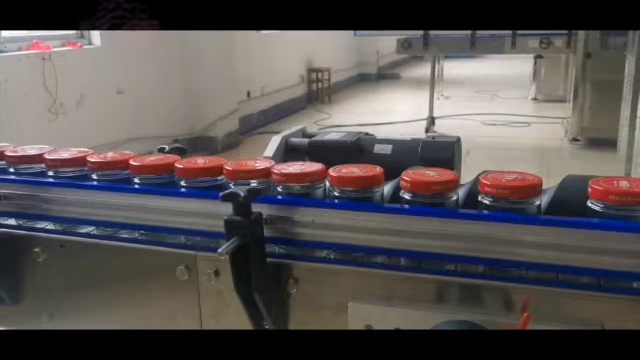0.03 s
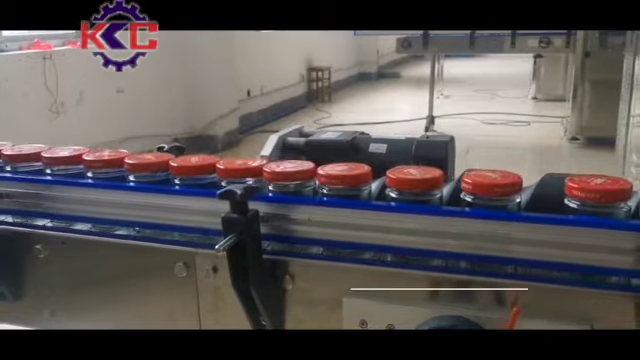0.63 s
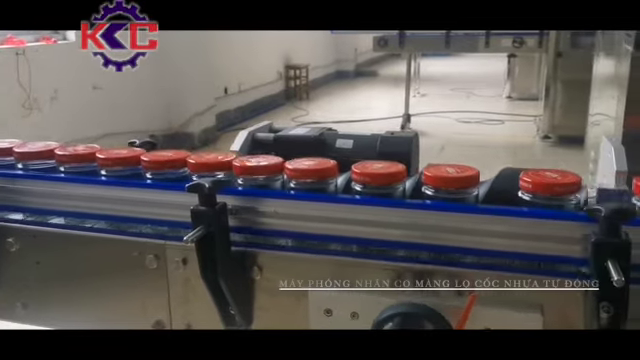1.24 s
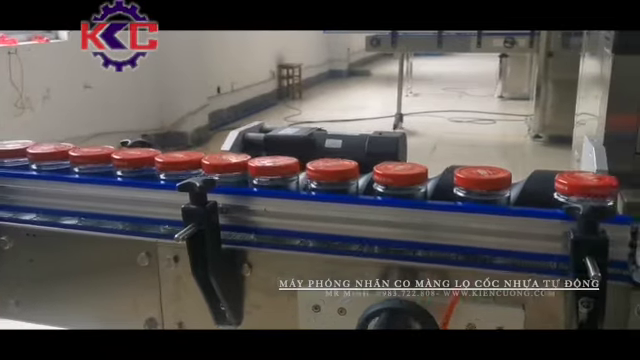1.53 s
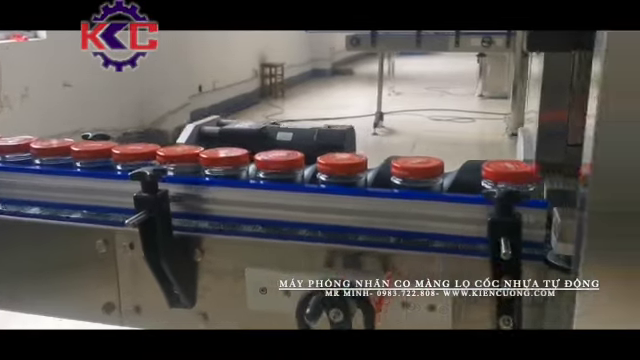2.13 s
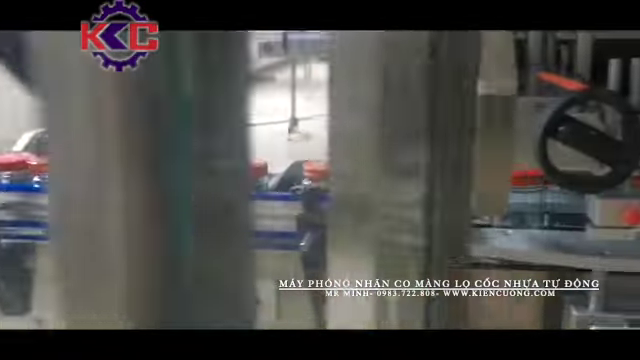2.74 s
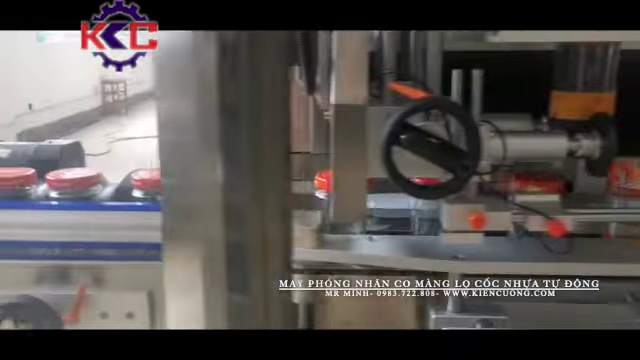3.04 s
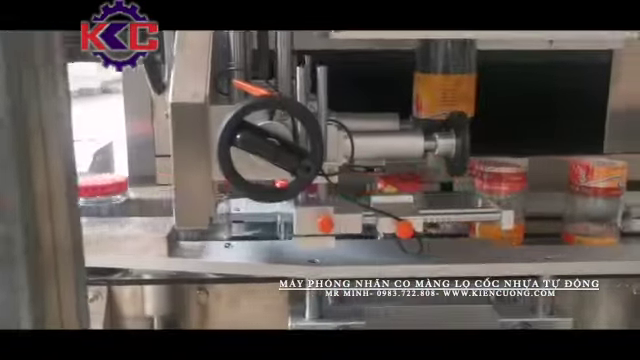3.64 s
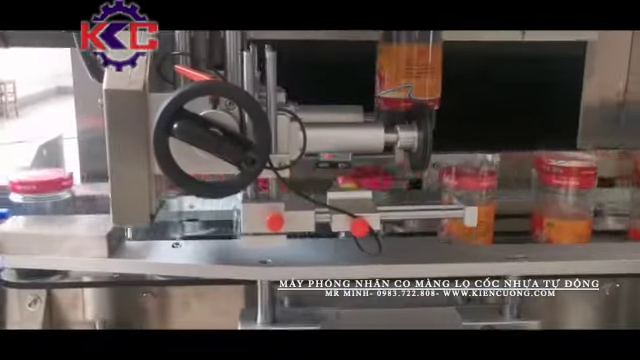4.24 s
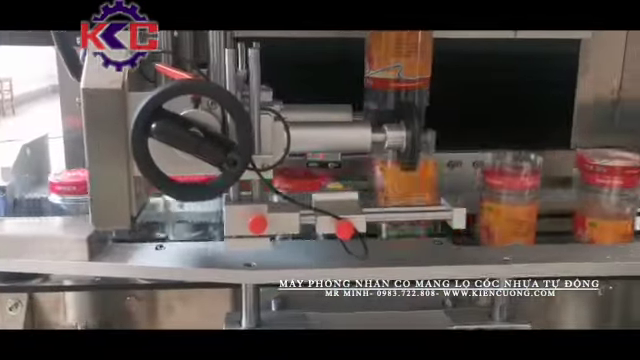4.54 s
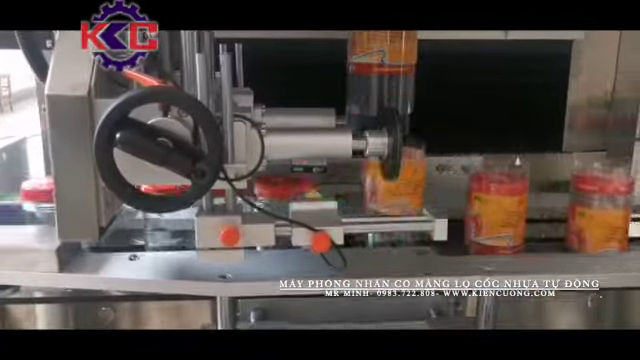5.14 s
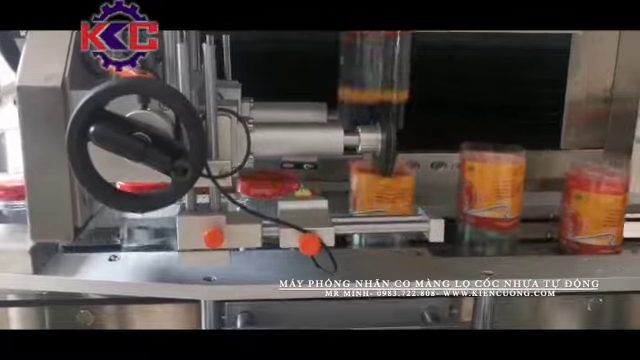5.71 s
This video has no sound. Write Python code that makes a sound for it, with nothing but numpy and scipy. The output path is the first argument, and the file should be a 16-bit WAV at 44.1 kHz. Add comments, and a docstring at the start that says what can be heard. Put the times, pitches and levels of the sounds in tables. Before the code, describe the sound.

Jars clink and scrape along a conveyor under a throbbing motor whine, followed by regular metallic clacks with puffs of air.

```python
"""Sleeve labeller in a factory hall

A throbbing motor whine sits over mains hum and conveyor rumble, and jars clink and rub along the
guide rail. The microphone starts at the conveyor and moves up to the labelling head, where every
0.6 s a pneumatic stroke snaps, hisses and clatters. The sound cuts in and drops out once, briefly."""
import sys
import numpy as np
from scipy import signal
from scipy.fft import rfft, irfft, next_fast_len
from scipy.io import wavfile
from scipy.ndimage import map_coordinates

SR = 44100
rng = np.random.default_rng(int(sys.argv[2]) if len(sys.argv) > 2 else 0)


def materialize(psi):
    """Save the field psi as 16-bit PCM at rate SR to the path in sys.argv[1].

    A 1-D psi becomes a single channel; in a 2-D psi each row is a channel.
    """
    bounded = np.clip(np.atleast_2d(psi).T, -1, 1)
    quanta = np.round(bounded * 32767).astype(np.int16)
    wavfile.write(sys.argv[1], SR, quanta)


N = 258867

# Pneumatic strokes. Each row: start in seconds, air and blade in relative dB, seconds from valve to
# end stop, end stop in relative dB, its body in dB against that, dip of the whine in dB.
STROKES = [(2.772, -31.5, -27, 0.09, -26, -25, -0.5), (3.3639, -35, -17.5, .0573, -21, -20, 13),
           (3.9498, -31.5, -21.5, .0717, -24, -28, 8.5), (4.5448, -33, -22.5, 0.053, -27, -11, 5),
           (5.128, -34.5, -26, .0565, -16.5, -16, 11), (5.7204, -36, -24, .058, -17, -18, 8.5)]
# The microphone's walk. Each row: time in seconds, place from 0 (conveyor) to 1 (labelling head).
MIC_PATH = [(0, 0), (2.2, 0), (3.2, 0.81), (5.87, 0.95)]


def motors():
    """The whine throbs with each turn of the shaft, most deeply at the head; weaker tones waver by it."""
    # The whine swells and fades along the machine. Each row: time in seconds, relative level in dB.
    whine_levels = [(0.28, -33.5), (0.74, -31.5), (0.84, -35), (0.94, -31.5), (1.16, -29), (1.26, -35.5),
                    (1.35, -29.5), (1.65, -32), (1.9, -29.5), (2.58, -28.5), (3.0, -34), (3.2, -31.5),
                    (4.6, -32.5), (5.87, -31)]
    # Side tones of the throb. Each row: offset in shaft rates, dB at the conveyor, dB at the head.
    side_tones = [(1, -12, -7.5), (-1, -30, -21)]
    # Weaker motor tones. Each row: pitch in Hz, relative dB at the conveyor and at the head.
    drive_tones = [(1114, -26, -25), (1142, -21, -18.5), (1165.5, -17, -12.5), (1194, -27, -24),
                   (1242, -19.5, -20.5), (1265, -26, -25), (1291, -22, -20), (1311, -28, -26)]
    whine_hz, shaft_hz = 1066.2, 24.3
    place = curve(MIC_PATH)
    dip_db = sum(depth_db * dip(s) for s, *_, depth_db in STROKES)
    phase = 2 * np.pi * np.cumsum(whine_hz + .7 * wobble(14)) / SR
    shaft = 2 * np.pi * (np.cumsum(shaft_hz + .5 * wobble(14)) / SR + rng.random())
    throb = sum(amp(conveyor_db + place * (head_db - conveyor_db)) * np.sin(phase + k * shaft)
                for k, conveyor_db, head_db in side_tones)
    waver = amp(.8 * wobble(22))
    whine = np.sqrt(2) * waver * (np.sin(phase) + amp(2 * wobble(12)) * throb)
    neighbours = amp(1) * wavering_tones(drive_tones, waver_db=4.5, drift_hz=3.5)
    return amp(curve(whine_levels) - dip_db - 1.05) * (whine + neighbours)


def air_puffs():
    """Each stroke lets out three spluttering puffs that run into each other."""
    # The puffs. Each row: peak in seconds after the valve, relative level in dB.
    puffs = [(0.033, -1), (0.072, 0), (.143, -7)]
    # Escaping air. Each row: frequency in Hz, relative level in dB.
    air_spectrum = [(300, 1), (1500, -1), (2600, 2.5), (4000, 2.5), (5100, 3.5), (5800, 0), (7600, -5),
                    (9100, -4), (10000, -7.5), (11200, -6.5), (12200, -12), (14000, -16)]
    flow = sum(amp(air_db + db) * swell(s + after, rise_s=.013, decay_s=.026)
               for s, air_db, *_ in STROKES for after, db in puffs)
    return flow * amp(wobble(260)) * noise(air_spectrum)


def knocks():
    """Valve, blade and end stop of every stroke: time in seconds, relative dB, body in dB against that."""
    valve_db, valve_body_db = -20, -28
    blade_s, blade_body_db = .037, -22
    for s, _, blade_db, stop_s, stop_db, stop_body_db, _ in STROKES:
        yield s, valve_db, valve_body_db
        yield s + blade_s, blade_db, blade_body_db
        yield s + stop_s, stop_db, stop_body_db


def cutter():
    """Each knock cracks sharply and rings the steel; the heavier ones also shake the body of the head."""
    # The snap of a knock. Each row: frequency in Hz, relative level in dB.
    snap_spectrum = [(300, -8), (1500, -8.5), (2500, -6.5), (3600, 5.5), (4800, 4.5), (5800, -2),
                     (7300, -4.5), (9000, -19), (10000, -23), (11100, -4), (12200, -12), (14000, -17)]
    # Resonances of the steel head. Each row: centre in Hz, width in Hz, relative level in dB.
    head_modes = [(2710, 520, -9), (3420, 460, -1.5), (3900, 93, 3), (4390, 90, -2), (5170, 230, -9),
                  (6740, 120, -17), (8040, 100, -11), (8880, 370, -11.5), (10730, 200, -9)]
    crack, chatter, body = np.zeros((3, N))
    for s, db, body_db in knocks():
        crack += amp(db) * burst(s, hold=.0014, t60=.011)
        blow = amp(db) * burst(s, hold=.0048, t60=.044)
        chatter += blow
        body += amp(body_db) * blow
    thud = body * noise([(100, -25), (700, -16), (2000, 2), (3000, -3), (4500, -34), (12000, -45)])
    snap = (amp(-24) * crack + amp(-13) * chatter) * noise(snap_spectrum)
    grit = amp(2 * wobble(700))
    ring = amp(-11) * chatter * resonant(head_modes)
    return grit * (snap + amp(-2) * thud) + ring


def jar_clinks():
    """Jars touch each other and the rail with a short ping; the hardest knock sets the rail ringing."""
    # The contacts. Each row: start in seconds, relative level in dB, ping in Hz.
    contacts = [(0.5194, -31, 4600), (0.6257, -26.5, 3320), (0.6844, -30.5, 4590), (0.764, -28, 4650),
                (1.287, -28.5, 3380), (1.3315, -30, 3350), (1.6682, -21.5, 4230), (2.0088, -30, 4620),
                (2.4558, -27, 5090), (2.5311, -31, 4750), (2.5755, -32, 5000)]
    # Modes of the guide rail. Each row: pitch in Hz, relative level in dB, seconds to fall 60 dB.
    rail_modes = [(2918, -20, 0.14), (3550, 4, 0.028), (4260, 3, 0.025), (4440, -9, 0.97), (5800, -12, .2),
                  (8600, -5, 0.097), (10900, -13, .08)]
    tick = noise([(1000, -23), (1700, 10), (4400, -1.5), (6000, -4), (9000, -13.5), (12000, -18),
                  (14000, -47)])
    clinks = np.zeros(N)
    for s, db, hz in contacts:
        ping = resonant([(hz, 250, 0)])
        clinks += amp(db) * burst(s, hold=.0028, t60=.12) * (amp(-14) * ping + amp(-13.5) * tick)
    hardest_s, _, _ = max(contacts, key=lambda contact: contact[1])
    rail = sum(amp(db - 38.5) * burst(hardest_s, hold=.0027, t60=t60) * tone(hz, drift_hz=109, rate=300)
               for hz, db, t60 in rail_modes)
    return clinks + rail


def jar_rubs():
    """Jars rub along the rail in small slips; the pressure builds fast and lets go more slowly."""
    # The rubs. Each row: loudest moment in seconds, relative level in dB, decay in seconds.
    rubs = [(0.789, -31.5, 0.064), (1.45, -27, 0.03), (2.039, -33, 0.041), (3.21, -32.5, .03),
            (3.518, -38, .025), (3.797, -34.5, .05), (5.595, -38.5, 0.022)]
    # Resonances of a rubbed jar. Each row: centre in Hz, width in Hz, relative level in dB.
    jar_modes = [(1864, 125, 1.5), (2080, 220, 1), (2367, 240, -4.5)]
    # The dry scratch. Each row: frequency in Hz, relative level in dB.
    scratch_spectrum = [(800, -33), (1600, 10.5), (2400, -14), (3200, -1), (5000, -7), (7200, -11.5),
                        (8600, -13), (13000, -48)]
    pressure = sum(amp(db) * swell(s, rise_s=.018, decay_s=decay) for s, db, decay in rubs)
    slips = amp(2.3 * wobble(170))
    return pressure * slips * (amp(-1) * resonant(jar_modes) + amp(-8) * noise(scratch_spectrum))


def conveyor():
    """The frame hums and rumbles while the belt hisses with a fine rattle, louder towards the head."""
    # Hum of motors and frame. Each row: pitch in Hz, relative dB at the conveyor and at the head.
    hum_tones = [(50, -29, -21), (78.2, -22.5, -15.5), (100.6, -16.5, -10), (174.3, -24, -23),
                 (200.8, -11.5, -17), (259.2, -14, -14), (505, -21, -27), (530.5, -12.8, -17),
                 (636.6, -14, -16), (906, -15, -28), (1596, -20, -15), (6040, -28.5, -41)]
    # Frame rumble and belt hiss. Each row: frequency in Hz, relative level in dB.
    rumble_spectrum = [(15, -46), (25, -15.5), (102, -1), (147, -3), (201, -1.5), (230, -3), (355, -5),
                       (517, -4), (565, -6), (900, -6.5), (1170, -18), (1980, -120)]
    belt_spectrum = [(500, -15.5), (900, 0.5), (1300, 6), (1480, -5.5), (1900, -6), (3100, -5),
                     (4800, -0.5), (5500, -9.5), (6200, -8.5), (7400, -19), (8800, -17), (11500, -20),
                     (13000, -30), (14000, -56)]
    place = curve(MIC_PATH)
    # near the head the rumble dips at each stroke, just after the whine
    frame_db = -38 - 7 * place * sum(dip(s + .014) for s, *_ in STROKES)
    hiss_db = -47.5 + 6 * place
    hum = wavering_tones(hum_tones, waver_db=2.5, drift_hz=2.173)
    rumble = amp(-1.5 + 1.6 * wobble(35)) * noise(rumble_spectrum)
    # the housing resonates broadly around the whine
    housing = amp(-3) * noise([(400, -27), (800, -14), (950, 2), (1300, -1.5), (1480, -5), (2000, -4),
                               (2800, -9), (6000, -33.5), (12000, -46)])
    belt = amp(hiss_db + 1.1 * wobble(90) + 1.9 * wobble(16)) * noise(belt_spectrum)
    # the belt sounds finer and brighter beside the conveyor
    fizz_gain = (1 - place) * amp(hiss_db - 13 + 1.6 * wobble(29.3))
    fizz = fizz_gain * noise([(4000, -38), (6000, 12), (7400, -4), (8800, 5), (11500, -5), (13500, -34)])
    return amp(frame_db) * (hum + rumble + housing) + belt + fizz


def hall(x):
    """The hall's tail: each frequency dies at its own speed."""
    # Reverberation. Each row: frequency in Hz, seconds to fall 60 dB.
    decay_times = [(200, .5), (2000, 1), (12000, 0.75)]
    hz, t, spectra = signal.stft(rng.standard_normal(SR // 2), SR, nperseg=256)
    decay = amp(-60 * t / along(decay_times, hz)[:, None])
    _, tail = signal.istft(spectra * decay, SR, nperseg=256)
    return signal.fftconvolve(x, tail / np.linalg.norm(tail))[:N]


def dip(s):
    """How far, 0 to 1, the steady sound has dipped around the stroke at time s."""
    # The dip. Each row: seconds after the valve, share of the full depth.
    dip_shape = [(-.04, 0), (.07, 1), (.2, .33), (.36, 0.017)]
    after, share = np.transpose(dip_shape)
    return np.interp(clock() - s, after, share, left=0, right=0)


def burst(s, hold, t60):
    """The envelope of a contact at time s: it holds for a moment, then dies away."""
    age = clock() - s
    return (age >= 0) * amp(-60 * np.clip(age - hold, 0, 1) / t60)


def swell(s, rise_s, decay_s):
    """An envelope that grows to 1 at time s and falls away."""
    age = clock() - s
    return np.exp(-np.maximum(-age / rise_s, age / decay_s))


def wavering_tones(table, waver_db, drift_hz):
    """Tones whose balance changes as the microphone moves along the machine."""
    place = curve(MIC_PATH)
    total = np.zeros(N)
    for hz, conveyor_db, head_db in table:
        db = conveyor_db + place * (head_db - conveyor_db) + waver_db * wobble(6)
        total += amp(db) * tone(hz, drift_hz, rate=14)
    return total


def tone(hz, drift_hz, rate):
    """A sine of rms 1 whose pitch wanders a little."""
    turns = np.cumsum(hz + drift_hz * wobble(rate)) / SR + rng.random()
    return np.sqrt(2) * np.sin(2 * np.pi * turns)


def resonant(modes):
    """Noise of rms 1 ringing in (Hz, width in Hz, dB) resonances of alternating sign."""
    def response(hz):
        return sum((-1) ** k * amp(db) * 1j * hz * width / (centre ** 2 - hz ** 2 + 1j * hz * width)
                   for k, (centre, width, db) in enumerate(modes))
    return unit(filtered(rng.standard_normal(N), response))


def noise(spectrum):
    """Noise of rms 1 coloured by (Hz, dB) points."""
    return unit(filtered(rng.standard_normal(N), lambda hz: amp(along(spectrum, hz))))


def filtered(x, response):
    """x shaped by a response of frequency."""
    size = next_fast_len(N + SR // 2)
    return irfft(rfft(x, size) * response(np.fft.rfftfreq(size, 1 / SR)), size)[:N]


def wobble(rate):
    """A smooth random curve, rate knots a second."""
    return map_coordinates(rng.standard_normal(int(N * rate / SR) + 4), [clock() * rate])


def curve(points):
    """(Seconds, value) points joined into one value per sample."""
    return np.interp(clock(), *np.transpose(points))


def along(points, hz):
    """(Hz, value) points read at hz on a log axis."""
    knots_hz, values = np.transpose(points)
    return np.interp(np.log(hz + 1), np.log(knots_hz + 1), values)


def clock():
    """The time of each sample in seconds."""
    return np.arange(N) / SR


def amp(db):
    """Decibels to gain."""
    return 10 ** (np.asarray(db) / 20)


def unit(x):
    """Scale to rms 1."""
    return x / np.sqrt(np.mean(x ** 2) + 1e-20)


def scene():
    """The steady machinery, and the strokes and jars with their echo in the hall."""
    work = air_puffs() + cutter() + jar_clinks() + jar_rubs()
    return (motors() + conveyor() + work + amp(-11) * hall(work))[None]


def record(dry):
    """One channel that cuts in a little low, comes up, drops out once and lacks the highest treble."""
    # Stretches with sound. Each row: start and end in seconds.
    live_spans = [(.272, .977), (1.036, 6)]
    fade_db, fade_s, top_hz = -4, .2, 14200
    t = clock()
    gate = sum(np.clip(np.minimum(t - start, end - t) / .002, 0, 1) for start, end in live_spans)
    cut_in_s = live_spans[0][0]
    fade = amp(fade_db * np.clip(1 - (t - cut_in_s) / fade_s, 0, 1))
    return filtered(dry[0] * gate * fade, lambda hz: np.clip((top_hz - hz) / 300 + .5, 0, 1))[None]


dry = scene()
out = record(dry)
materialize(out)
```